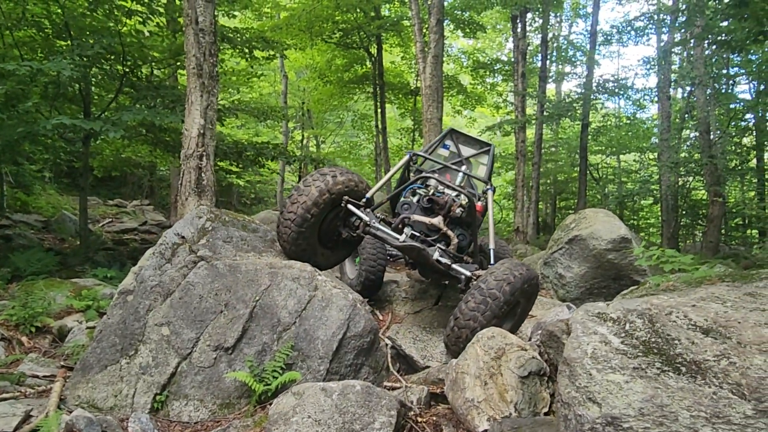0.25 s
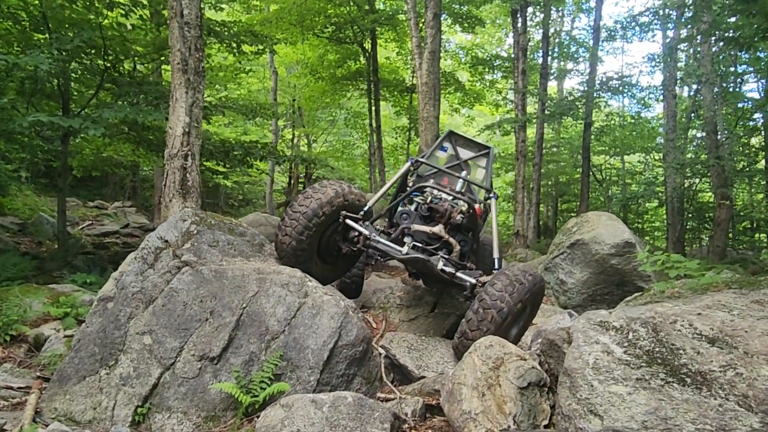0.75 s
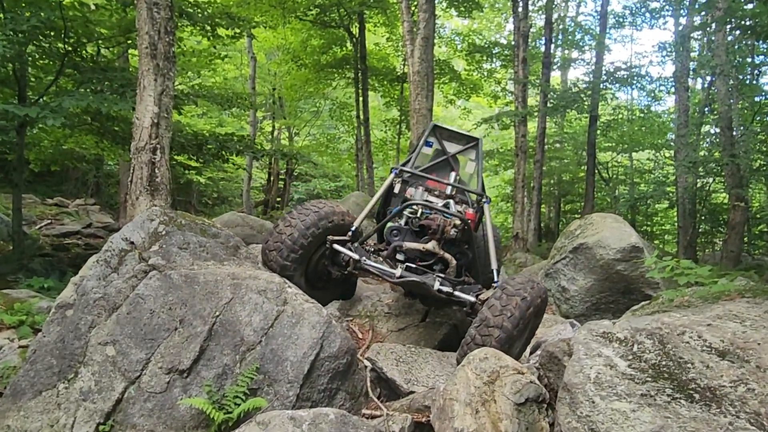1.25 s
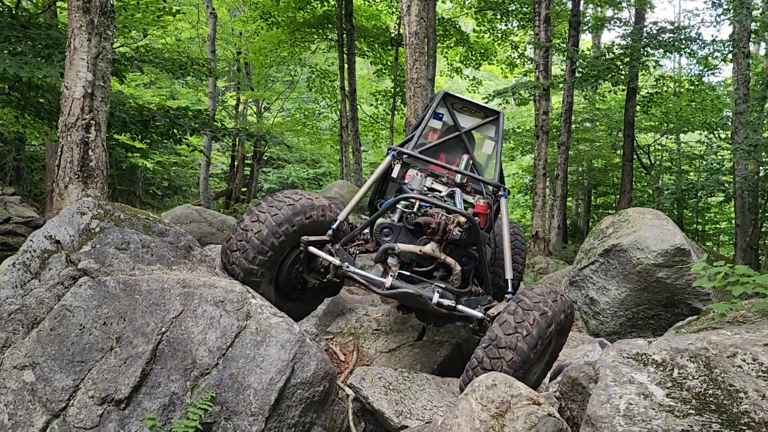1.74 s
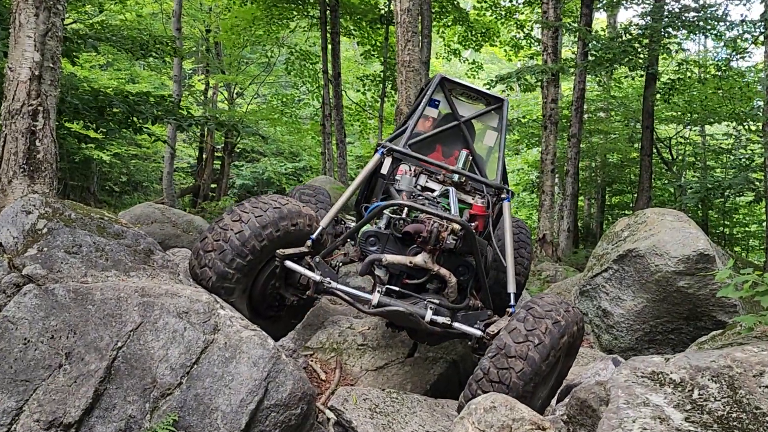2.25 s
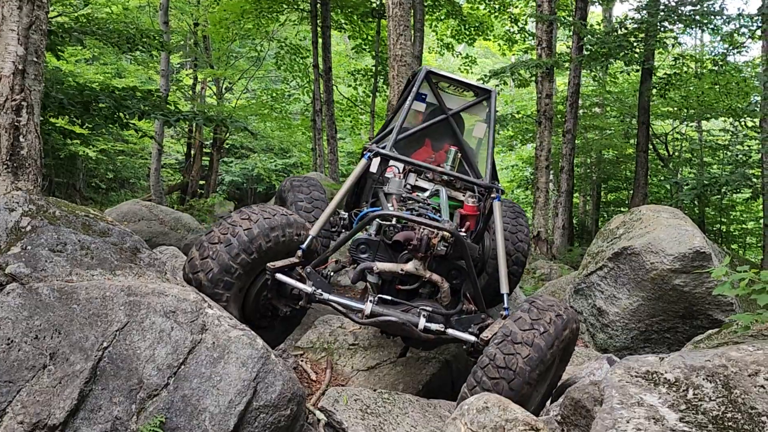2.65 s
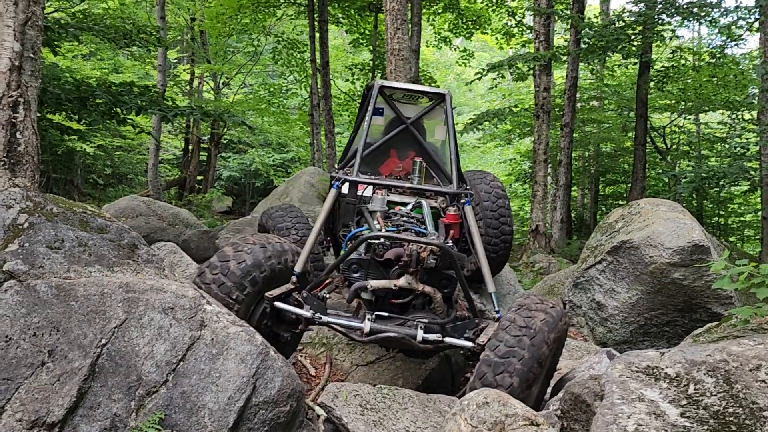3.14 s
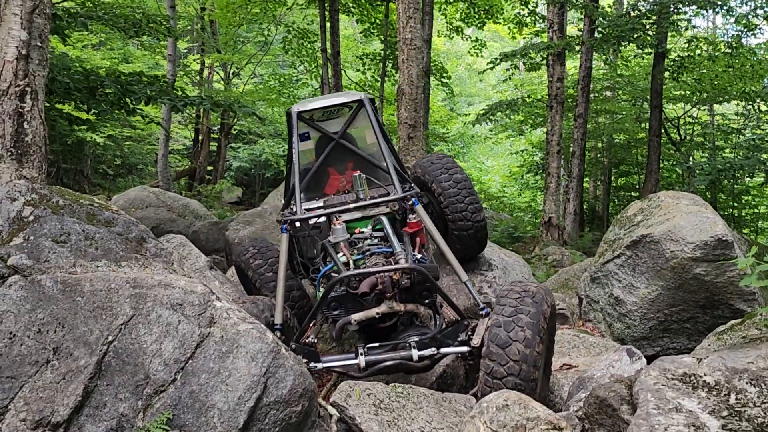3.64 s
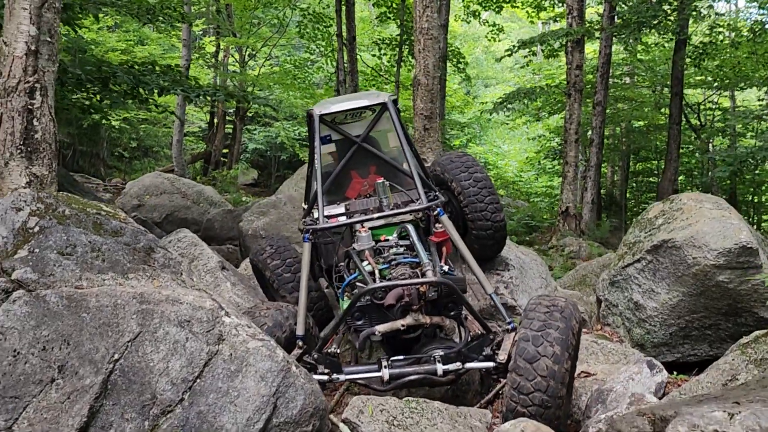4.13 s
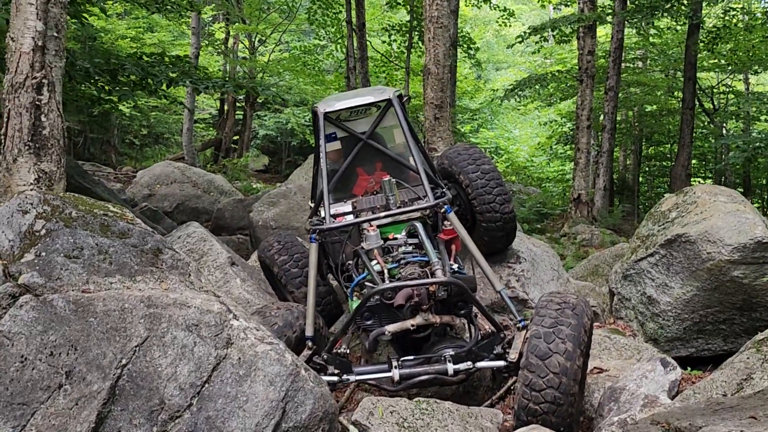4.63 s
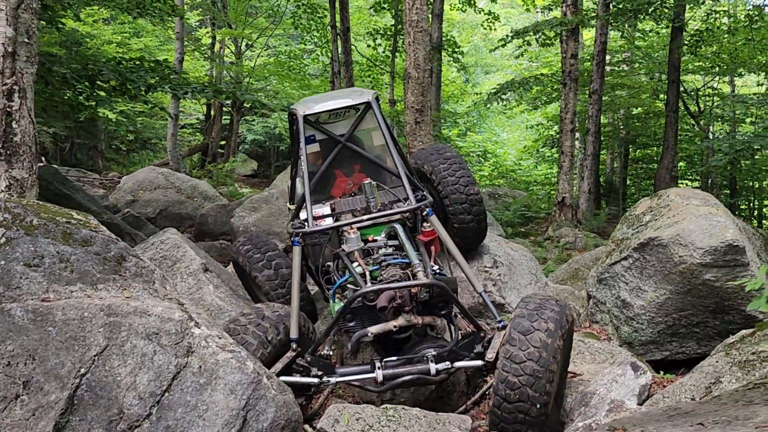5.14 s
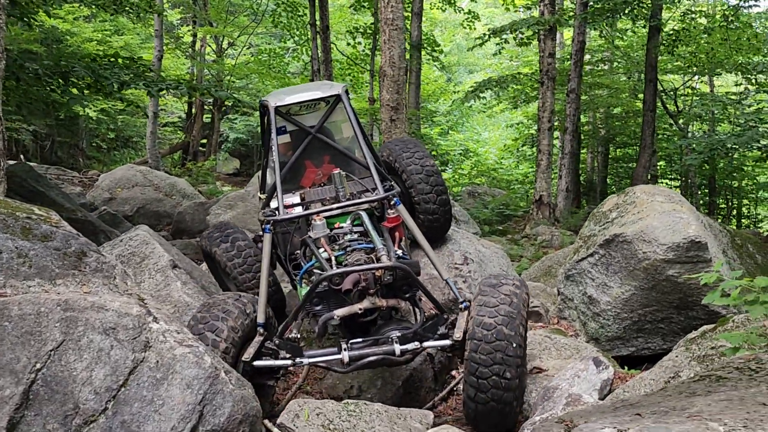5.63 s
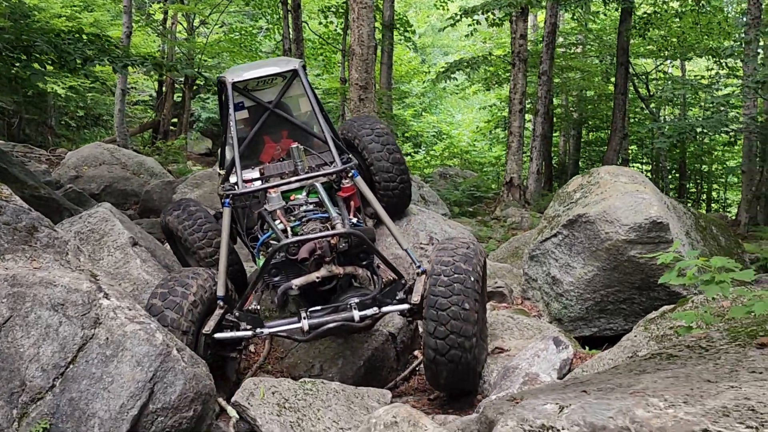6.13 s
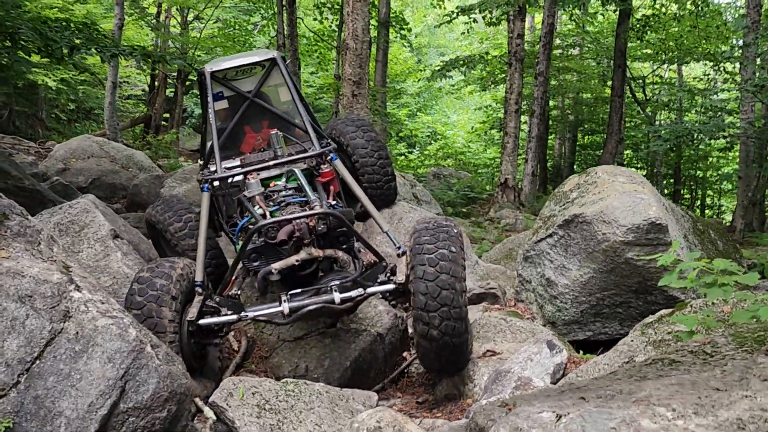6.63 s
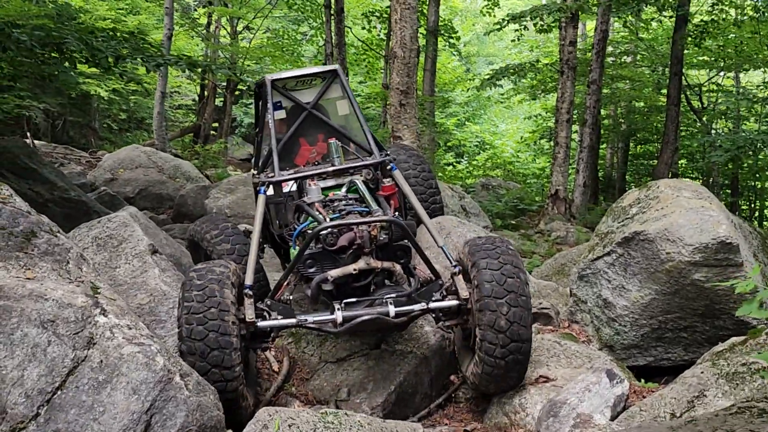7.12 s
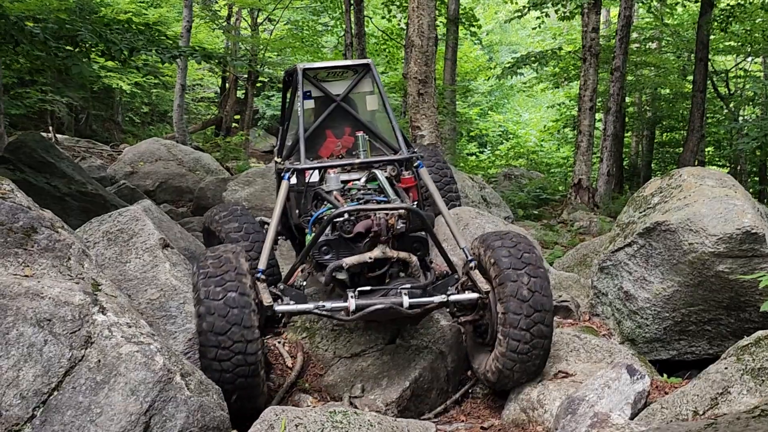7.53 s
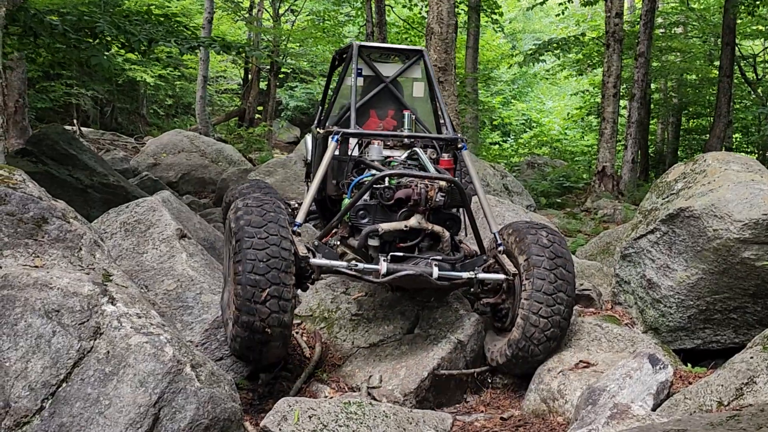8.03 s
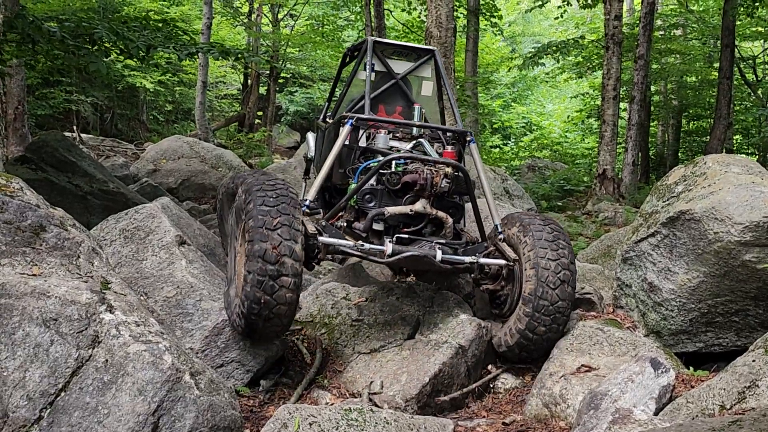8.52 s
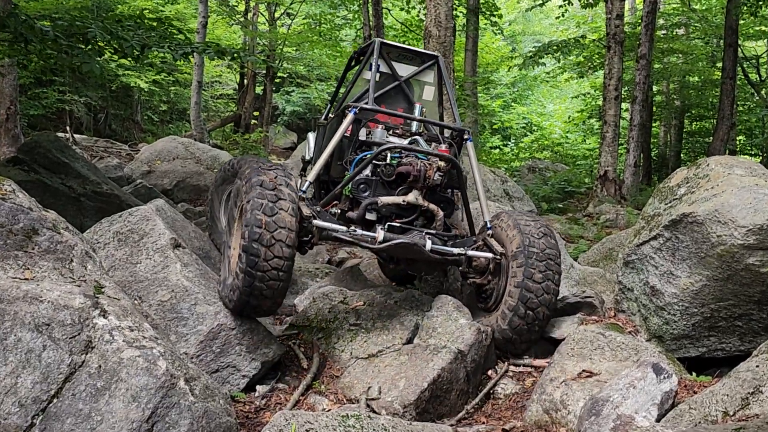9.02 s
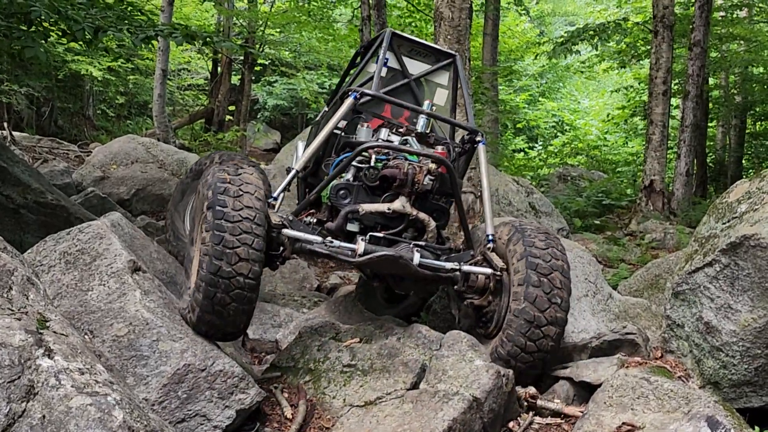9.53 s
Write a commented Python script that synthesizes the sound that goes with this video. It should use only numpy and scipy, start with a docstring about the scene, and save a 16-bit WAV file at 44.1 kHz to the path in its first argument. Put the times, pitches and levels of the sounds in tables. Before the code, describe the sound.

A flat-four buggy engine booms and burbles in throttle surges as it crawls over forest boulders, with raspy exhaust crackle and brief metallic squeaks.

```python
"""A wood: a flat-four rock buggy crawls over boulders in surges of throttle.
Each firing booms in the exhaust pipe, barks in the headers and spits a crack of gas (pulses and noise
into resonances). Valve gear and fan rush as ticking noise; steering hydraulics sing and the chassis
squeaks as narrow noise on gliding pitches. Rocks and trunks scatter it as decaying trains of reflections."""
import sys
import numpy as np
from scipy import signal
from scipy.fft import rfft, irfft
from scipy.io import wavfile
from scipy.ndimage import uniform_filter1d

SR = 44100
rng = np.random.default_rng(int(sys.argv[2]) if len(sys.argv) > 2 else 0)


def materialize(psi):
    """Save the field psi as 16-bit PCM at rate SR to the path in sys.argv[1].

    A 1-D psi becomes a single channel; in a 2-D psi each row is a channel.
    """
    bounded = np.clip(np.atleast_2d(psi).T, -1, 1)
    quanta = np.round(bounded * 32767).astype(np.int16)
    wavfile.write(sys.argv[1], SR, quanta)


N = 430857
TIME_S = np.arange(N) / SR
CRUISE_HZ = 40  # firings per second

# valve gear and fan, relative spectrum: (frequency [Hz], level [dB])
MACHINE_SPECTRUM = [(30, 2), (200, -12.5), (360, -10), (650, -6), (830, -14.5), (1400, -19), (1900, -25),
                    (2700, -19.5), (7500, -24), (9500, -37.5), (15500, -39)]
# steering hydraulics: (start [s], end [s], pitch at cruising speed [Hz],
#   pitch per engine speed [octave/octave], nominal width [Hz], relative level [dB])
WHINES = [(-.5, .5, 4280, .26, 300, -42), (.6, 1.8, 4300, .26, 380, -38.5),
          (3.95, 5.35, 2230, .1, 170, -41.5), (5.45, 7.6, 2220, .12, 230, -46)]
WHINE_FADE_S, OIL_LAG_S = .45, .15
# chassis squeaks: (start [s], length [s], start pitch [Hz], end pitch [Hz],
#   unsteadiness [Hz], relative level [dB])
SQUEAKS = [(3.72, .22, 2920, 2940, 240, -34.5), (5.109, .14, 4820, 4980, 380, -22.5),
           (5.615, .086, 5280, 5170, 300, -34), (5.69, .087, 5400, 5350, 300, -34),
           (5.767, .37, 5180, 5240, 460, -25), (6.421, .05, 5150, 5200, 250, -29),
           (6.494, .091, 5500, 5500, 200, -27), (8.87, .26, 10630, 10600, 240, -27.5),
           (9.6, .25, 10300, 10450, 120, -42)]

# engine speed: (time [s], firings per second [Hz])
FIRING_RATE = [(0.0, 32.23), (0.1, 25.99), (0.32, 33.92), (0.56, 51.86), (0.8, 59.9), (1.11, 61.0),
               (1.41, 29.37), (1.59, 24.03), (2.04, 37.38), (2.66, 36.69), (3.24, 43.05), (3.45, 39.35),
               (3.98, 21.93), (4.62, 30.65), (4.69, 34.12), (5.04, 39.4), (5.4, 39.64), (5.85, 34.54),
               (6.78, 33.63), (7.01, 29.42), (7.25, 28.4), (7.5, 43.4), (7.87, 51.37), (8.46, 46.04),
               (9.5, 46.27), (9.77, 39.39)]
# throttle surges: (opens [s], attack [s], closes [s], release [s], easing off [1/s],
#   tone while open: boom [dB], growl [dB], honk [dB], rasp [dB])
SURGES = [(.04, .42, 1.12, .13, .5, 0, -4, 6, 1), (1.58, .35, 3.22, .24, .02, 1.3, -.5, -5.3, -5),
          (4.02, .72, 5.4, .4, .03, 1.1, 2.3, -4, -.5), (5.2, .6, 6.7, .2, 0, -.6, 2.5, -4.5, -2.2),
          (7.14, .22, 9.66, .4, .37, 1.5, 1.2, 2.3, 4.3)]
# cylinders in firing order, headers of unequal length: (boom [dB], crack [dB], lag [s],
#   nominal valve opening [share of one firing])
CYLINDERS = [(-1.5, -10, 0.0004, 0.064), (-0.2, -7.5, 0.0014, 0.038), (-1.1, -6.5, 0.0004, 0.045),
             (-0.2, -8.5, 0.00055, 0.045)]
# pipe coming into tune with the engine and out again:
#   (firings per second [Hz], base boom [dB], base growl [dB])
PIPE_TUNING = [(23.2, -27, -42), (29.6, -24, -35.5), (35.1, -22, -34), (40.8, -20, -26), (46.2, -17, -24),
               (50.5, -20, -22), (59.5, -19.5, -23.5)]
# exhaust tone as the buggy twists on the rocks:
#   (time [s], pulse returning down the pipe [share], drone [dB])
TWIST = [(1.2, 0.55, -3), (2.3, 0.81, -15), (3.15, 0.61, -1.5), (3.7, 0.42, 10), (4.7, 0.03, -42),
         (7.1, 0.5, -14), (7.6, 0.61, 3.5), (8.4, 0.83, 11), (9.7, .66, 11)]
# exhaust pipe resonances: (frequency [Hz], width [Hz], relative level [dB])
PIPE_MODES = [(74, 14.5, -5.5), (101, 142, 3), (119.5, 6.9, 7.5), (203.3, 13.6, -2.5), (249.5, 4.7, -25.5)]
# low resonance that drones as the buggy twists: (frequency [Hz], width [Hz], relative level [dB])
DRONE_MODES = [(337, 101, 1.5)]
# mid resonances that honk at high speed: (frequency [Hz], width [Hz], relative level [dB])
HONK_MODES = [(464.6, 44, 4.5), (519, 22, -1.5)]
# header resonances: (frequency [Hz], width [Hz], relative level [dB])
HEADER_MODES = [(687, 53, -3), (966, 51, -8.5), (1088, 17, -4), (1365, 130, -5)]
# collector where the headers meet: (frequency [Hz], width [Hz], relative level [dB])
COLLECTOR_MODES = [(1580, 55, 0)]
# thin metal rung by the crack: (frequency [Hz], width [Hz], relative level [dB])
TINWORK_MODES = [(2973, 64, 3), (3996, 480, 4.5), (4680, 150, 0.5), (5450, 200, -2), (7380, 270, 0.5)]
# gas crack, relative spectrum: (frequency [Hz], level [dB])
CRACK_SPECTRUM = [(700, -7), (1500, 3), (1880, -10.5), (2120, 1), (3400, -3.5), (4500, -2.5), (6400, 1),
                  (9800, -13), (15500, -9.5)]
# treble favouring the right ear: (frequency [Hz], left minus right [dB])
LEANING = [(200, 0.05), (1300, -1.5), (2400, -0.5), (4400, -10), (8000, -1.5), (15000, -3.5)]

# gain at full throttle, and per octave a second of speeding up
BOOM_THROTTLE_DB, BOOM_PULL_DB = 3.5, 0.47
# base level coasting at cruising speed, gain at full throttle, gain per octave of speed
HONK_DB, HONK_THROTTLE_DB, HONK_OCTAVE_DB = -43, 15, 8
BARK_DB, BARK_THROTTLE_DB, BARK_OCTAVE_DB = -44.5, 14, 2
CRACK_DB, CRACK_THROTTLE_DB, CRACK_OCTAVE_DB = -39, 15, 0
CRACK_PULL_DB = 0.93  # per octave a second of speeding up
COLLECTOR_DB, COLLECTOR_GROWTH = 7, 1.2  # base level; dB per dB of rasp
EAR_LAG_S, EAR_LIKENESS = .00007, 0.11
TOP_HZ = 16100


def undb(db):
    """Decibels to gain."""
    return 10 ** (np.asarray(db) / 20)


def curves(table):
    """Columns of a table of rows (time [s], ..), interpolated at every sample."""
    s, *columns = np.transpose(table)
    return [np.interp(TIME_S, s, c) for c in columns]


def unit(x):
    """Scale to rms 1."""
    return x / np.sqrt(np.mean(x ** 2))


def steady(x, size=5000):
    """Scale to rms 1 over a few firings, keeping the single beats."""
    power = np.mean(np.atleast_2d(x) ** 2, axis=0)
    smooth_power = uniform_filter1d(uniform_filter1d(power, size), size)
    return x / np.sqrt(smooth_power + 1e-18)


def ring(x, modes):
    """Parallel resonances (frequency [Hz], width [Hz], level [dB])."""
    return sum(undb(db) * signal.lfilter(*signal.iirpeak(hz, hz / width_hz, fs=SR), x)
               for hz, width_hz, db in modes)


def cut(x, hz, kind, order=2):
    """Butterworth low-pass or high-pass."""
    return signal.sosfilt(signal.butter(order, hz, kind, fs=SR, output="sos"), x)


def split(x, hz):
    """Parts below and above a frequency, without phase shift."""
    low = signal.sosfiltfilt(signal.butter(5, hz, fs=SR, output="sos"), x)
    return low, x - low


def colour(x, points, size=2048):
    """Minimum-phase filter with the spectrum (frequency [Hz], level [dB]), on each channel."""
    hz, db = np.transpose(points)
    bins_hz = np.fft.rfftfreq(size, 1 / SR)
    gain = undb(np.interp(np.log(bins_hz + 1), np.log(hz), db))
    cepstrum = irfft(np.log(gain))[:size // 2]
    cepstrum[1:] *= 2
    impulse = irfft(np.exp(rfft(cepstrum, size)))
    return signal.fftconvolve(x, impulse[None], axes=1)[:, :N]


def stereo_noise(likeness):
    """Two noises with a shared part."""
    shared, share = rng.standard_normal(N), np.clip(likeness, 0, 1)
    return np.sqrt(share) * shared + np.sqrt(1 - share) * rng.standard_normal((2, N))


def narrow_noise(hz, width_hz, waver=0.13):
    """Rough tone that wavers about a pitch curve."""
    wobble = cut(rng.standard_normal((2, len(hz))), width_hz / 3, "low")
    drift_hz = waver * width_hz * unit(cut(rng.standard_normal(len(hz)), 12.4, "low"))
    angle = 2 * np.pi * np.cumsum(hz + drift_hz) / SR
    return unit(wobble[0] * np.cos(angle) + wobble[1] * np.sin(angle))


def scatter(x, decay_s, count=2):
    """Dense train of small reflections that dies away, different at each ear."""
    age_s = np.arange(int(8 * decay_s * SR)) / SR
    echoes = rng.standard_normal((len(age_s), count)).T * np.exp(-age_s / decay_s)
    echoes /= np.sqrt(np.sum(echoes ** 2, axis=1, keepdims=True))
    return signal.fftconvolve(np.atleast_2d(x), echoes, axes=1)[:, :N]


def puff(age, rise):
    """A valve opens and the pressure drains: peak 1 at age = rise."""
    return age / rise * np.exp(1 - age / rise)


def vary(firing, spread_db):
    """A new random gain at every firing."""
    return undb(spread_db * rng.standard_normal(firing[-1] + 1)[firing])


def machinery(level_db=-36, tick_depth=0.033):
    """Valve gear and fan: a rush that ticks twice a firing."""
    hz, = curves(FIRING_RATE)
    ticks = 1 + tick_depth * np.cos(4 * np.pi * np.cumsum(hz) / SR)
    rumble = cut(rng.standard_normal(N), 1000, "low", order=1)
    air = rumble + cut(stereo_noise(0.82), 520, "high", order=1)
    return unit(colour(air * ticks, MACHINE_SPECTRUM)) * undb(level_db)


def hydraulics():
    """Oil sings in the steering valve; the engine drives the pump, so pitch follows speed a little late."""
    hz, = curves(FIRING_RATE)
    flow = np.interp(TIME_S - OIL_LAG_S, TIME_S, hz) / CRUISE_HZ
    out = 0
    for start_s, end_s, pitch_hz, follow, width_hz, db in WHINES:
        swell = np.clip(np.minimum(TIME_S - start_s, end_s - TIME_S) / WHINE_FADE_S, 0, 1)
        out = out + undb(db) * swell * narrow_noise(pitch_hz * flow ** follow, width_hz)
    return out


def squeaks(rise_share=0.23):
    """Loaded joints and brakes slip in short, rough squeals."""
    out = np.zeros(N + SR)
    for start_s, length_s, start_hz, end_hz, width_hz, db in SQUEAKS:
        progress = np.linspace(0, 1, int(length_s * SR))
        swell = puff(progress, rise_share) * np.sqrt(1 - progress ** 4)
        pitch_hz = start_hz + (end_hz - start_hz) * progress
        out[int(start_s * SR):][:len(progress)] += undb(db) * swell * narrow_noise(pitch_hz, width_hz)
    return out[:N]


def throttle_and_tone():
    """Each surge opens, eases off and shuts; its tone holds while open, then turns into that of the next."""
    throttle, times_s, tones_db = 0, [], []
    for opens_s, attack_s, closes_s, release_s, easing_per_s, *tone_db in SURGES:
        pressed = np.clip((TIME_S - opens_s) / attack_s, 0, 1)
        held = np.exp(-easing_per_s * np.maximum(TIME_S - opens_s - attack_s, 0))
        lifted = np.exp(-np.maximum(TIME_S - closes_s, 0) / release_s)
        throttle = np.maximum(throttle, pressed * held * lifted)
        times_s += [opens_s + attack_s, closes_s]
        tones_db += [tone_db, tone_db]
    return throttle, curves(np.column_stack([times_s, tones_db]))


def loudness(hz):
    """Levels [dB] of boom, growl, honk, bark, crack, collector: deep ones follow speed, sharp ones throttle."""
    throttle, (boom, growl, honk, rasp) = throttle_and_tone()
    speeds_hz, tuned_boom, tuned_growl = np.transpose(PIPE_TUNING)
    octaves = np.log2(hz / CRUISE_HZ)
    pull = uniform_filter1d(np.gradient(octaves) * SR, size=8000)  # octaves per second
    boom = boom + np.interp(hz, speeds_hz, tuned_boom)
    boom = boom + BOOM_THROTTLE_DB * throttle + BOOM_PULL_DB * pull
    growl = growl + np.interp(hz, speeds_hz, tuned_growl)
    honk = honk + HONK_DB + HONK_THROTTLE_DB * throttle + HONK_OCTAVE_DB * octaves
    bark = rasp + BARK_DB + BARK_THROTTLE_DB * throttle + BARK_OCTAVE_DB * octaves
    crack = rasp + CRACK_DB + CRACK_THROTTLE_DB * throttle + CRACK_OCTAVE_DB * octaves
    crack = crack + CRACK_PULL_DB * np.maximum(pull, 0)
    collector = COLLECTOR_GROWTH * rasp + COLLECTOR_DB
    return boom, growl, honk, bark, crack, collector


def exhaust_pipe(pressure, swirl, gas_db=1, return_s=0.01164):
    """Pulses, their return after one round trip of the pipe, and gas ring it; gives boom and growl."""
    returned, drone_db = curves(TWIST)
    pressure = pressure + returned * np.interp(TIME_S - return_s, TIME_S, pressure)
    flow = pressure + undb(gas_db) * swirl
    pipe = ring(flow, PIPE_MODES) + undb(drone_db) * ring(flow, DRONE_MODES)
    above_34 = split(pipe, 34.0)[1]
    below_311 = split(above_34, 311.0)[0]
    boom, growl = split(below_311, 205.0)
    return steady(boom), steady(growl)


def mid_honk(edge, swirl, gas_db=-9):
    """The sharp edge of each pulse and the swirling gas ring the mid resonances."""
    honk = ring(edge + undb(gas_db) * swirl, HONK_MODES)
    return steady(cut(cut(honk, 382, "high", order=4), 697, "low", order=4))


def header_bark(firing, shock, burst, collector_db, gas_db=-3, colour_scatter_db=3):
    """Shock front and turbulent gas ring headers and collector, each stroke in its own header colour."""
    blow = 10 * shock + undb(gas_db) * burst * stereo_noise(0.63)
    headers = sum(ring(blow * vary(firing, colour_scatter_db), [mode]) for mode in HEADER_MODES)
    headers = headers + undb(collector_db) * ring(blow, COLLECTOR_MODES)
    return steady(cut(split(headers, 1490)[0], 336, "high", order=3))


def gas_crack(firing, shock, burst, age_s, hz, crack_db):
    """The shock rattles through the tube frame, gas spits as fresh noise, and both ring thin metal."""
    # the frame's reflections are alike at every firing
    rasp = unit(scatter(shock, 0.018)) * 0.67 + unit(burst * stereo_noise(0.14))
    tin = sum(ring(rasp * vary(firing, 3.7), [mode]) for mode in TINWORK_MODES)
    dull, fizz = split(steady(colour(rasp + tin, CRACK_SPECTRUM)), 7100)
    # the fizz grows with the crack level and is strongest just as the valve opens
    sharpness = np.clip((crack_db + 53) / 19, .35, 1.3) * (hz / 40) ** 0.1
    sharpness = sharpness * (0.87 + 0.29 * puff(age_s, 0.0023))
    return dull + sharpness * fizz


def engine(boom_scatter_db=0.88, crack_scatter_db=2.16, tail_db=-12, hiss_db=-17):
    """Four cylinders fire in turn into the exhaust; returns the deep voice and the sharp rasp."""
    hz, = curves(FIRING_RATE)
    boom_db, growl_db, honk_db, bark_db, crack_db, collector_db = loudness(hz)
    turns = np.cumsum(hz) / SR + .03  # one turn per firing
    firing, phase = turns.astype(int), turns % 1
    age_s = phase / hz
    own_boom_db, own_crack_db, lag_s, opening = np.array(CYLINDERS)[firing % len(CYLINDERS)].T

    # combustion is less even near idle
    push = undb(own_boom_db) * vary(firing, boom_scatter_db * (40 / hz) ** 2)
    spit = undb(own_crack_db) * vary(firing, crack_scatter_db)
    # the valve opens over a set crank angle, so the pulse sharpens with speed; unequal lags make the burble
    pressure = -push * puff(np.maximum(phase - lag_s * hz, 0), opening * vary(firing, 0.73))
    # the gas column settles into a cleaner note as the speed rises
    swirl = puff(age_s, 0.015) * rng.standard_normal(N) * np.minimum(36 / hz, 1) ** 2.15
    edge_gain = spit * vary(firing, 5.0 * (CRUISE_HZ / hz) ** 2)
    edge = -edge_gain * puff(np.maximum(age_s - lag_s, 0), 0.00086)
    shock = np.diff(firing, prepend=0) * spit
    # some gas hisses on between firings
    burst = spit * (puff(age_s, 0.0024) + undb(tail_db) * puff(age_s, 0.006)) + undb(hiss_db)

    boom, growl = exhaust_pipe(pressure, swirl)
    voice = boom * undb(boom_db) + growl * undb(growl_db) + mid_honk(edge, swirl) * undb(honk_db)
    bark = header_bark(firing, shock, burst, collector_db)
    crack = gas_crack(firing, shock, burst, age_s, hz, crack_db)
    return voice + bark * undb(bark_db), crack * undb(crack_db)


def at_the_ears(deep, bright):
    """Part of the bright sound is common to both ears, a moment apart; each ear has its own colour."""
    share = np.clip(EAR_LIKENESS, 0, 1)
    common = np.roll(bright[0], round(EAR_LAG_S * SR))
    right = np.sqrt(share) * common + np.sqrt(1 - share) * bright[1]
    both = deep + np.array([bright[0], right])
    ears = []
    for ear, sign in zip(both, (1, -1)):
        lean = [(hz, sign * db / 2) for hz, db in LEANING]
        ears.append(colour(ear[None], lean))
    return np.vstack(ears)


def scene(rocks_db=-11, wood_db=-17, low_wood_db=-19):
    """The buggy among boulders, with a faint tail from the trees."""
    voice, rasp = engine()
    squeal = hydraulics() + squeaks()
    # squeals come from under the chassis, mostly by way of the rocks
    bright = rasp + .5 * squeal + scatter(squeal, 0.0074)
    bright = bright + undb(rocks_db) * scatter(bright, 0.029) + undb(wood_db) * scatter(bright, 0.21)
    deep = voice + undb(low_wood_db) * scatter(voice, 0.02)
    return at_the_ears(deep, bright) + machinery()


def record(dry):
    """Clip at full scale, then cut the top with a steep elliptic low-pass."""
    low_pass = signal.ellip(10, .2, 70, TOP_HZ, fs=SR, output="sos")
    return signal.sosfilt(low_pass, np.clip(dry, -1, 1))


dry = scene()
out = record(dry)
materialize(out)
```